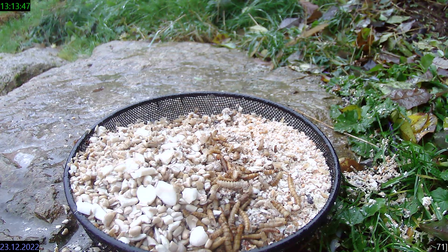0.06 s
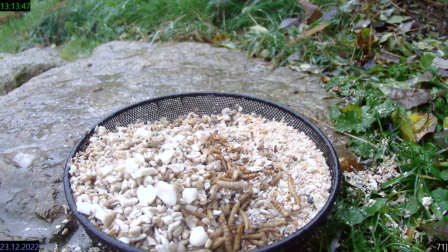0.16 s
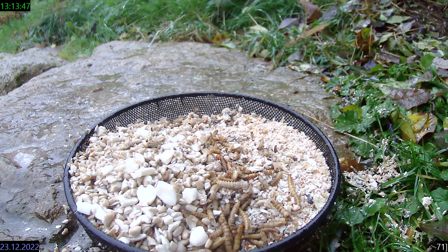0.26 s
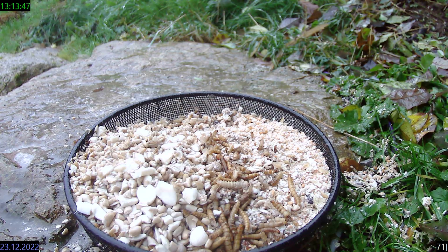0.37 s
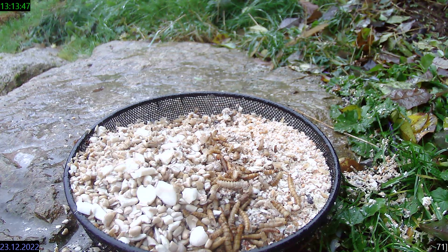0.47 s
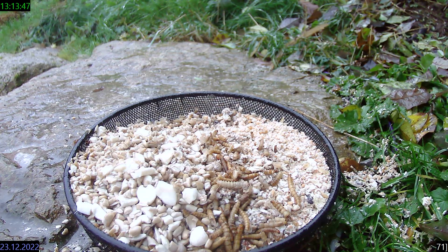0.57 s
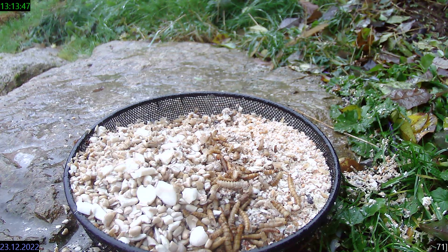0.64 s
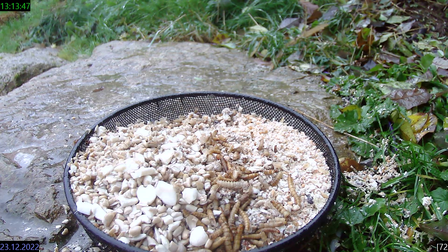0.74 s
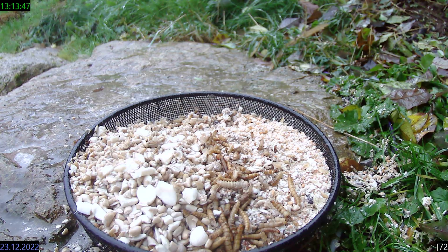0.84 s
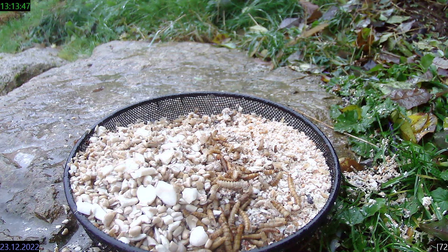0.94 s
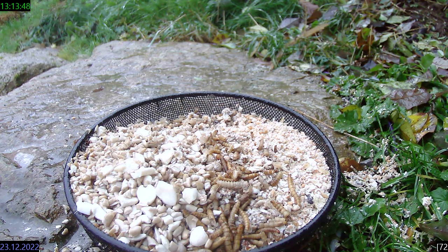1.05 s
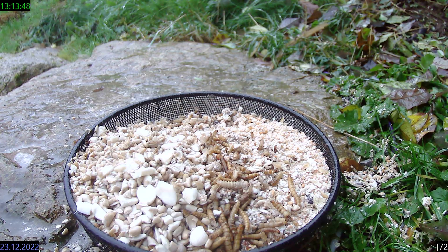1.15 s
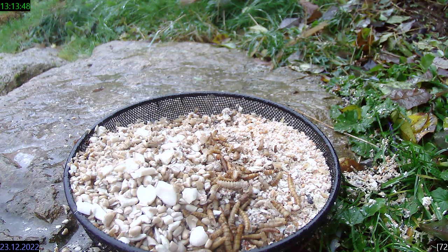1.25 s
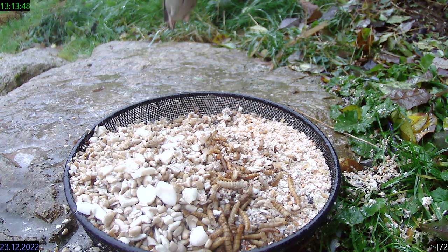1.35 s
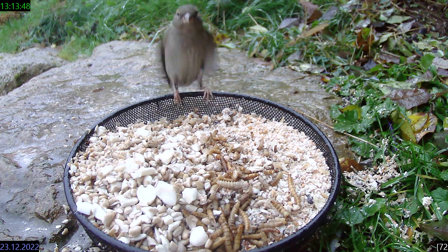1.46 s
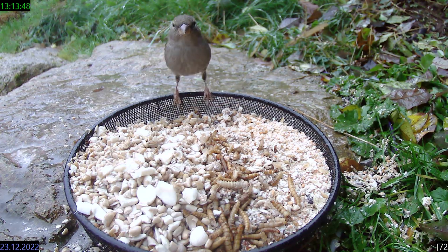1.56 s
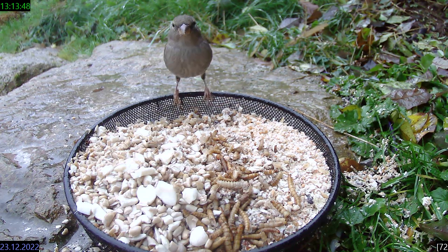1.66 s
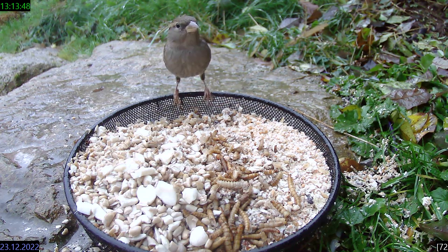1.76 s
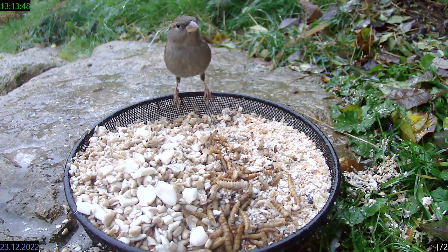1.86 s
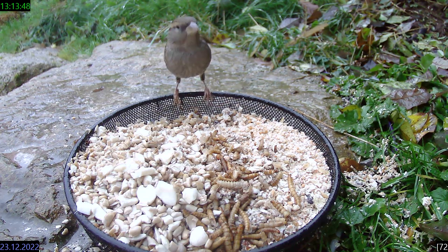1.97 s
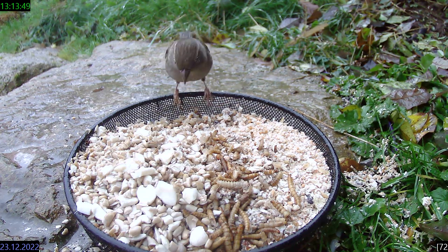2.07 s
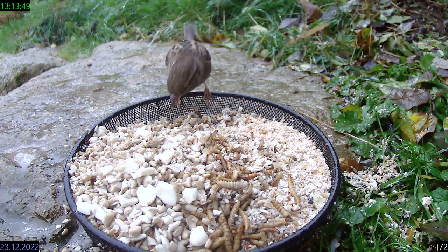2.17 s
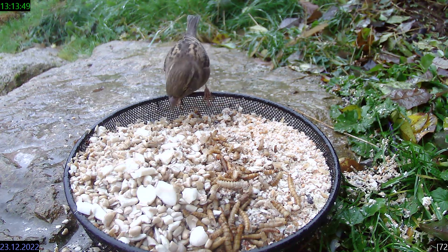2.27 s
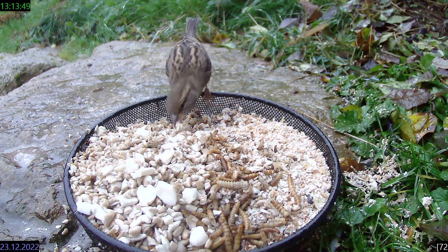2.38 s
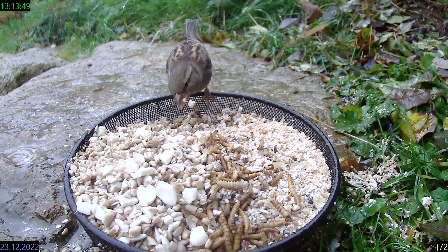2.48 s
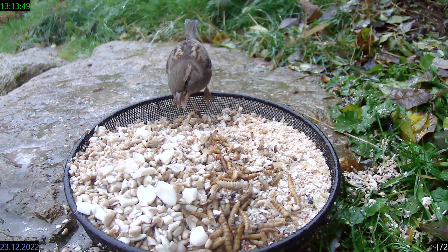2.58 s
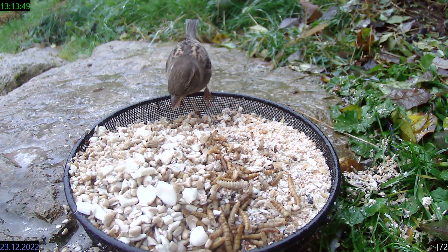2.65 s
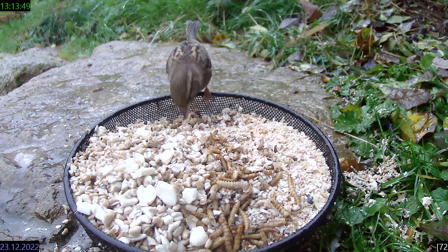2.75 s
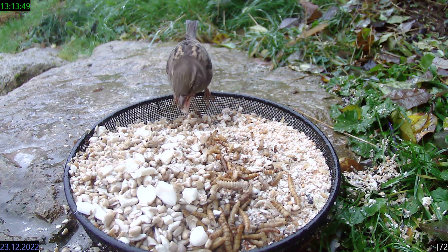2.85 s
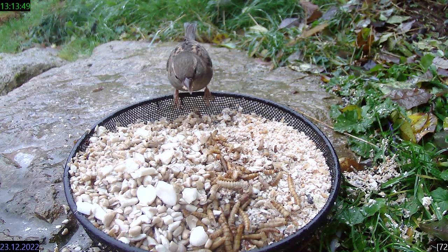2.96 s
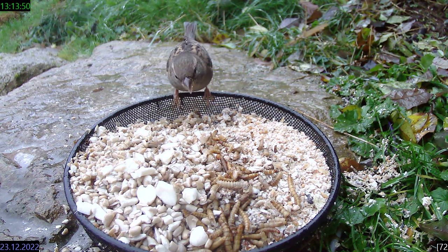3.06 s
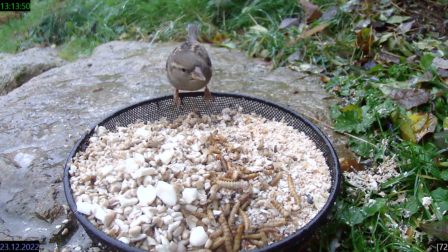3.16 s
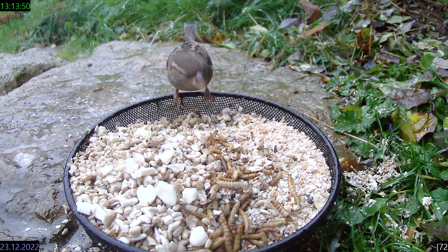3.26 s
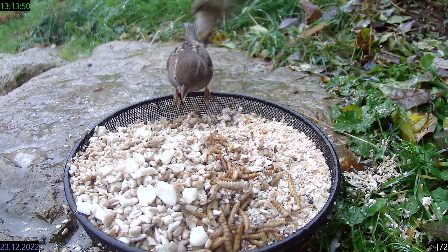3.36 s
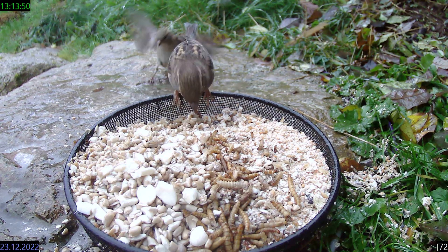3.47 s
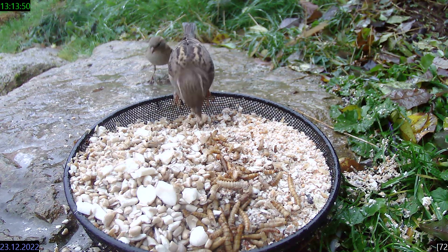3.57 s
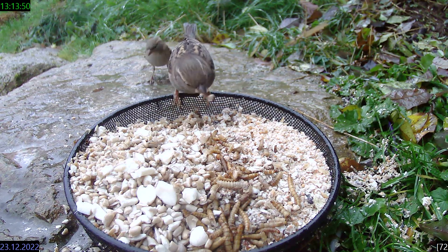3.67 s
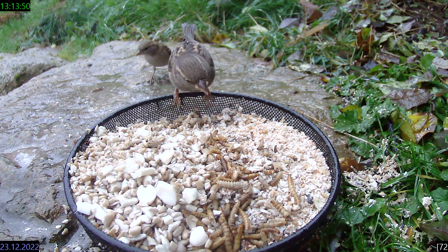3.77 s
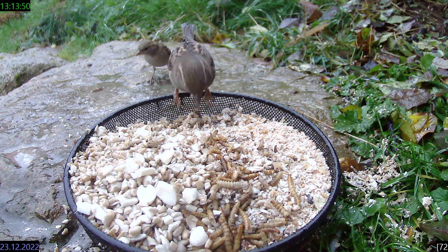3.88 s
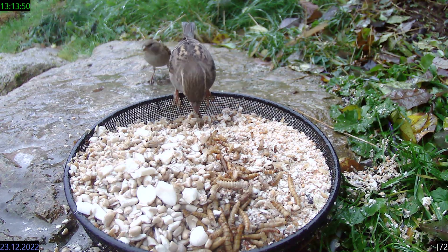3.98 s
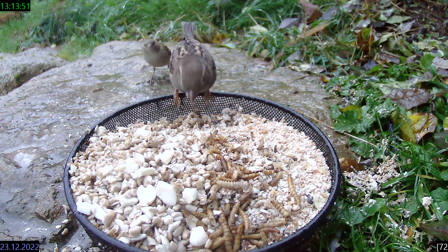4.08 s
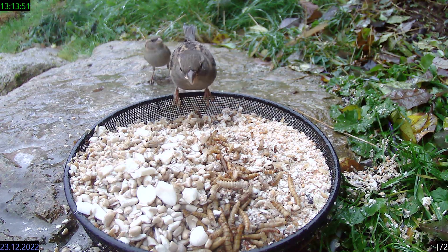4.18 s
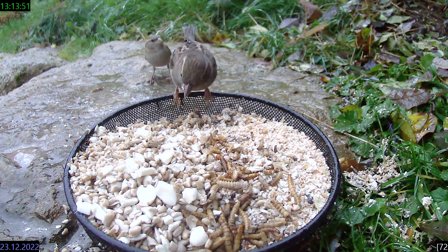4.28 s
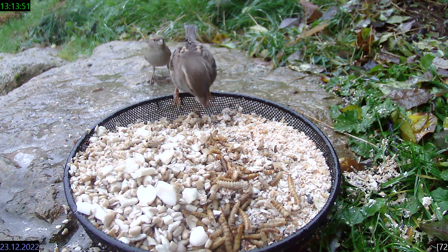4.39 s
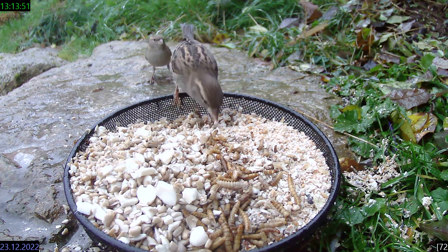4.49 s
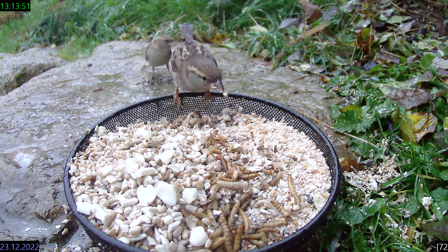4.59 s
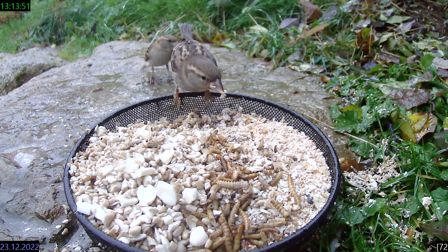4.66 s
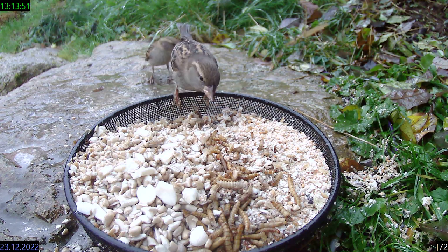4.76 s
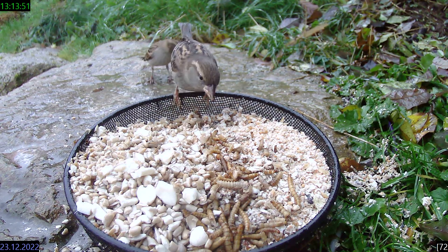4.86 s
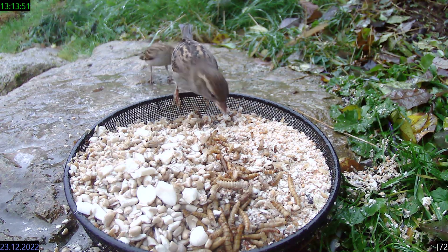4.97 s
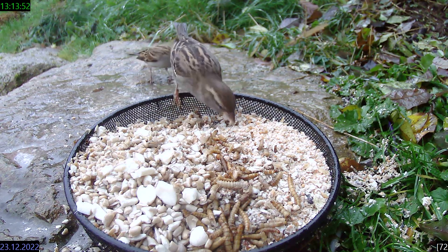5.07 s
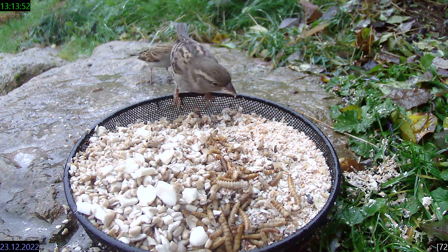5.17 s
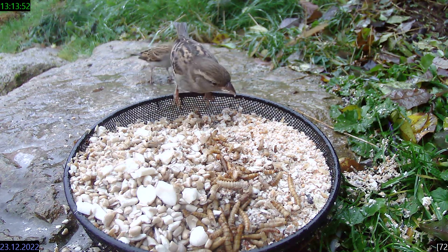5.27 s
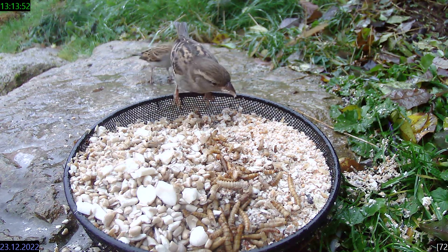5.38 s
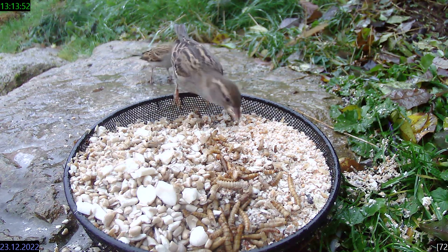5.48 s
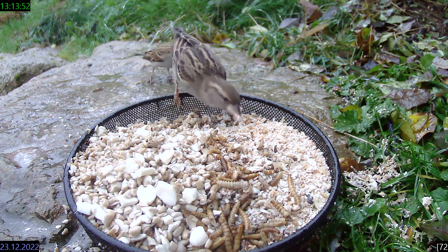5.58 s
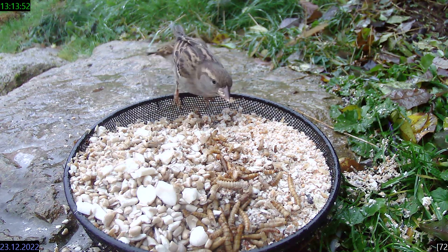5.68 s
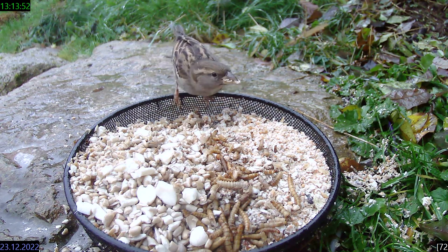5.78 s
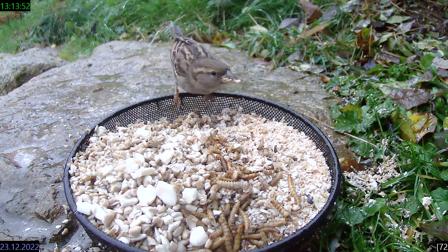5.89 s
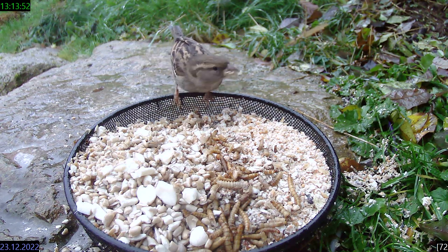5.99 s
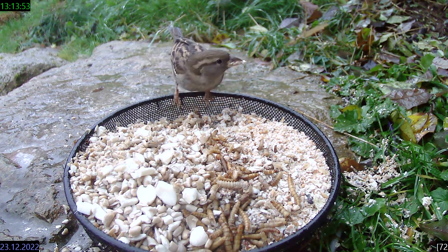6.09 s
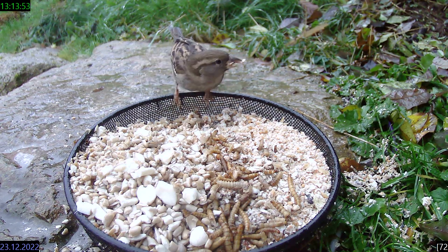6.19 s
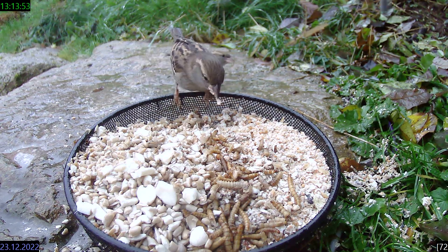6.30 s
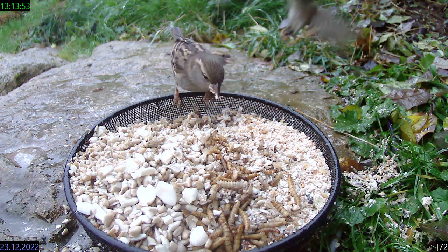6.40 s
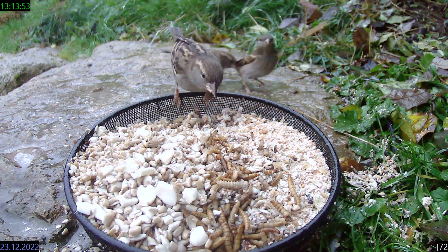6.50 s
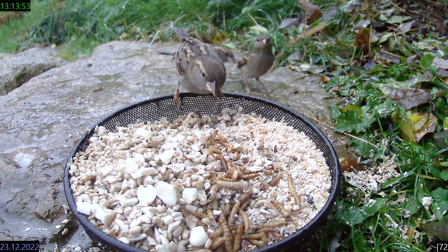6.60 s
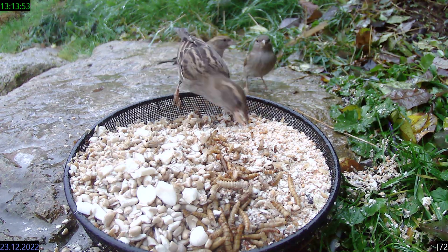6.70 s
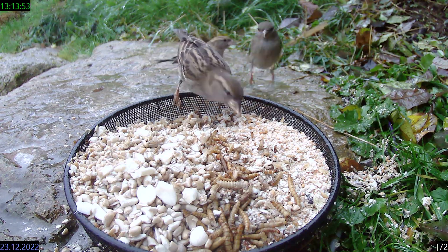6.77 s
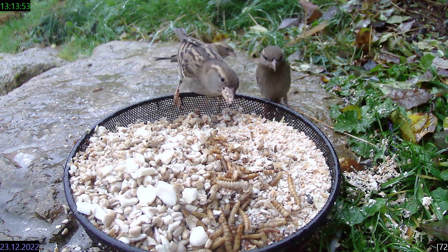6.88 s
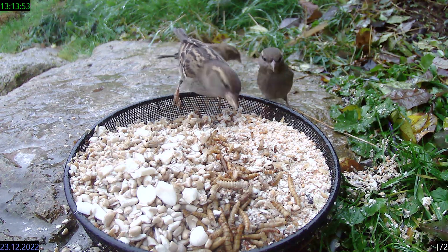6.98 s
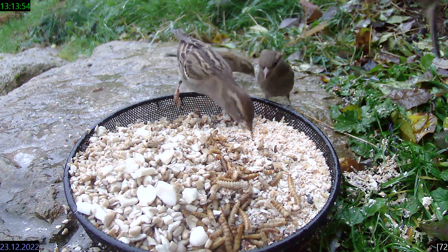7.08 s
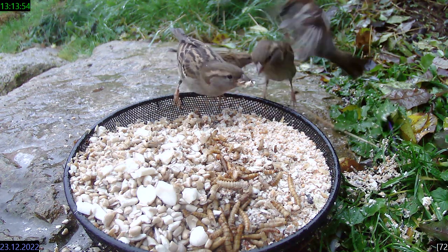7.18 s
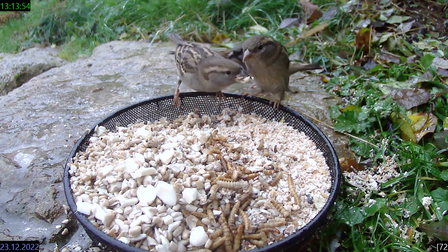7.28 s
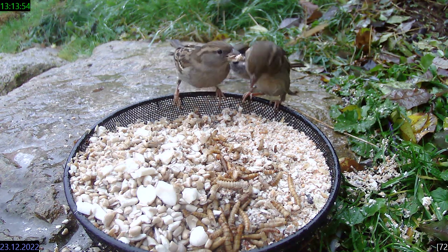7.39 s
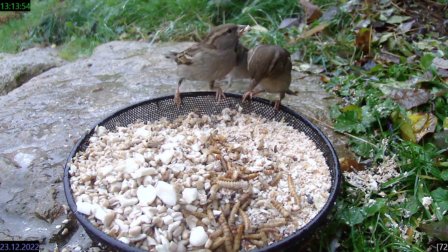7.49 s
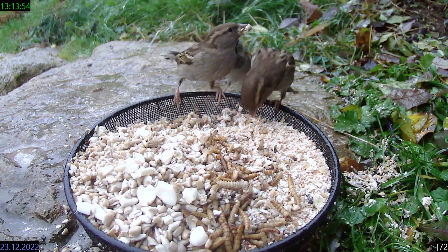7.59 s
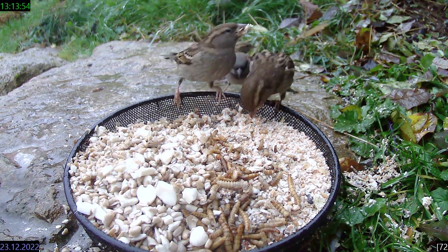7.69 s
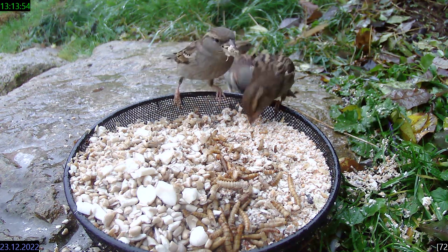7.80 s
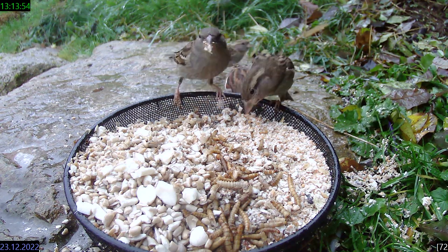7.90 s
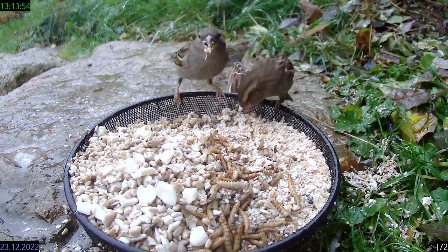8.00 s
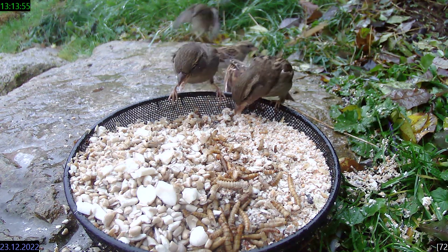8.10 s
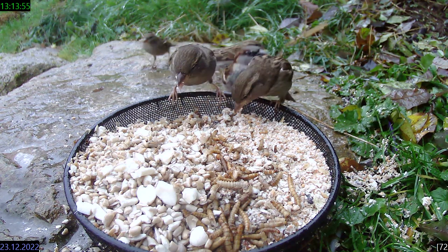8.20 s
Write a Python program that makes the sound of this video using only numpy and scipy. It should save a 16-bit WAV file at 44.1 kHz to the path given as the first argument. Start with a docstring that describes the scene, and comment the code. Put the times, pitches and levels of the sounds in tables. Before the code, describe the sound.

Small birds flutter in with short, soft bursts of rapid wingbeats at a seed tray, with light pecking ticks and brief chirps over quiet garden hiss.

```python
"""Garden hiss and faint far hums are heard first; chirps and ticks of claws and beaks join them.
Then sparrows fly in flurries to a seed tray on a rock, close to a small camera microphone.
Noise filtered by spectra and bands gives hiss, ticks and feather swish; gliding sines give hums and chirps.
Each wingbeat is a clap of accelerating cycles, a swish of noise and a push of air: a dip, then a surge.
The recorder adds a wandering offset, drops out once, and limits the band."""
import sys
import numpy as np
from scipy import signal
from scipy.fft import rfft, irfft
from scipy.io import wavfile
from scipy.ndimage import uniform_filter1d

SR = 44100
rng = np.random.default_rng(int(sys.argv[2]) if len(sys.argv) > 2 else 0)


def generate_wav(signal):
    """Clip the signal to [-1, 1] and save it as 16-bit WAV at the path in sys.argv[1]."""
    frames = np.transpose(np.atleast_2d(signal))
    scaled = np.clip(frames, -1, 1) * 32767
    pcm = np.round(scaled).astype(np.int16)
    wavfile.write(sys.argv[1], SR, pcm)


N = 363692  # length [samples]

# Wingbeats: (time of clap [s], clap level [dB], clap pitch [Hz], low swish level [dB],
# high swish level [dB], air push level [dB])
WINGBEATS = [(.866, -60, 390, -63, -67, -65), (.897, -47.5, 463, -64, -66, -55),
             (.9344, -49, 480, -64, -64, -59), (.9785, -49.5, 750, -61.5, -63.5, -56),
             (1.0142, -48.5, 450, -62, -64, -53), (1.1257, -55, 200, -75, -62.5, -60),
             (1.1643, -40, 467, -50.5, -57.5, -44), (1.2047, -44.5, 540, -53, -60, -52),
             (1.2431, -40.5, 660, -50, -57.5, -53), (1.2817, -41, 248, -57, -62, -44.5),
             (1.3034, -61, 560, -64, -64, -70), (1.3309, -60, 660, -58.5, -65, -44.5),
             (1.4158, -65, 430, -61, -60, -38), (1.4525, -42, 330, -48.5, -55.5, -41),
             (1.4907, -55, 726, -68, -66, -65), (3.1141, -58, 360, -68, -72, -68),
             (3.148, -50.5, 314, -62, -65.5, -51), (3.188, -50.5, 340, -65, -63, -47),
             (3.229, -48, 242, -56, -62, -49), (3.2699, -46, 246, -52.5, -64, -48),
             (3.3118, -59, 290, -52, -64, -49), (3.3519, -45, 248, -49, -60, -46),
             (3.3929, -43, 790, -51, -58.5, -44), (3.4302, -48, 336, -45, -57.5, -43),
             (3.4681, -61, 296, -57, -63, -68), (6.1649, -59, 250, -64, -62.5, -70),
             (6.2032, -41.5, 406, -60, -59, -54), (6.2411, -43, 363, -56, -60.5, -66),
             (6.278, -50, 272, -59, -61.5, -49.5), (6.3295, -53, 200, -56, -60.5, -52),
             (6.367, -49, 283, -66, -70, -70), (6.378, -46, 510, -52, -58, -45.5),
             (6.4188, -49, 320, -53.5, -64, -45), (6.452, -54, 370, -56, -65.5, -68),
             (6.469, -50, 600, -68, -66, -70), (6.5114, -48.5, 488, -65, -62.5, -68),
             (6.5545, -49, 370, -54, -61.5, -54), (6.5978, -39, 540, -56, -65, -68),
             (6.609, -47, 600, -65, -72, -70), (6.6356, -55, 427, -61, -70, -61),
             (6.649, -47, 547, -54.5, -72, -70), (6.9339, -63, 805, -61.5, -64.5, -47),
             (7.0215, -61, 288, -54.5, -59, -38), (7.0594, -47, 230, -48.5, -56.5, -35.5),
             (7.1015, -36.5, 430, -45.5, -54, -37), (7.1442, -36, 740, -44.5, -49, -40),
             (7.1845, -40.5, 527, -43, -50, -42.5), (7.21, -52, 290, -51, -65, -34.5),
             (7.2401, -59.5, 340, -70, -77, -53), (7.8503, -54.5, 218, -66, -67, -55),
             (7.894, -54, 348, -59.5, -66, -53), (7.9352, -45, 345, -62.5, -64.5, -51),
             (7.9783, -50, 280, -62, -65.5, -58), (8.0214, -45, 300, -55, -63.5, -49),
             (8.0636, -46, 396, -49, -62, -50), (8.1022, -43.5, 488, -54, -62.5, -62),
             (8.14, -58, 194, -57, -66.5, -70)]
# Claws, beaks and feather snaps: (time [s], peak level [dB], pitch [Hz], knock level [dB], scratch level [dB])
TICK_EVENTS = [(0.5097, -63, 2970, -64, -53), (0.575, -54, 4200, -75, -72), (0.6077, -47.5, 3260, -67, -71),
               (.856, -50, 3120, -74, -67), (0.9756, -47.5, 2800, -75, -58), (1.2996, -56, 2950, -55, -60),
               (1.342, -49, 3900, -57, -51), (1.926, -59, 3660, -64, -59), (2.2872, -56, 3330, -66, -63),
               (2.3696, -58, 3350, -61, -63), (2.391, -63, 3480, -60, -49), (2.419, -55, 3360, -59, -56),
               (3.3867, -57, 3770, -53, -59), (3.4269, -46, 3030, -45, -45), (3.434, -45, 2650, -63, -58),
               (3.4638, -56, 2840, -65, -61), (3.6233, -72, 3320, -65, -51), (3.9834, -54, 4900, -61, -66),
               (4.2102, -55, 3000, -72, -68), (4.4097, -56, 3200, -66, -60), (4.503, -56.5, 3350, -66, -57),
               (4.787, -58, 3070, -71, -68), (5.065, -60, 3710, -56, -66), (5.0762, -57, 2990, -62, -67),
               (5.452, -50, 3150, -55, -65), (5.6186, -55.5, 3430, -63, -58), (5.6562, -58, 3160, -72, -56),
               (5.7802, -63, 3410, -72, -53), (6.056, -60, 2820, -63, -52), (6.6925, -50, 3120, -70, -58),
               (7.1004, -46, 2630, -40, -55), (7.1416, -40, 3040, -41, -41), (7.161, -44, 4270, -39.5, -58),
               (7.18, -38.5, 2810, -56, -52), (7.21, -39, 2690, -41.5, -38), (7.2443, -50, 3120, -67, -64),
               (7.2744, -58, 3330, -69, -54), (7.315, -57, 3360, -61, -55), (7.399, -51, 3380, -73, -61),
               (7.618, -58, 2600, -58, -69), (7.676, -58, 3120, -60, -51), (7.849, -58, 3420, -60, -45.5),
               (7.872, -63, 2520, -68, -53), (7.9378, -53, 4330, -70, -62)]
# Chirps, one curve for each voice of the throat: (time [s], pitch [Hz], level before flutter [dB])
CHIRP_CURVES = [
    [(0.178, 4670, -71), (.225, 4280, -77), (.245, 4300, -75)],
    [(.677, 4760, -61), (.686, 5700, -62), (.696, 5300, -68), (.706, 5000, -58)],
    [(.677, 4250, -57), (.686, 4620, -56), (.701, 4570, -70)],
    [(.722, 5100, -58), (.738, 5250, -60), (.75, 5100, -62), (.762, 4400, -65), (.777, 3600, -64)],
    [(.722, 4330, -60), (.735, 4000, -63), (.746, 3930, -56.5), (.755, 3800, -51), (.765, 3540, -70)],
    [(1.885, 1320, -58.5), (1.915, 1290, -74)],
    [(4.605, 4270, -79), (4.68, 4350, -78)],
    [(4.85, 4250, -78), (4.92, 4250, -79)],
    [(5.495, 11000, -69), (5.512, 10900, -76)],
    [(6.964, 4930, -52.5), (6.98, 4350, -64), (6.993, 4000, -63), (7.012, 3470, -65)],
    [(6.97, 3600, -70), (6.99, 3400, -69)],
    [(7.346, 8650, -70), (7.361, 9400, -73), (7.372, 9400, -71)],
]
# Spectrum of feather swish through the housing: (frequency [Hz], relative level per Hz [dB])
FEATHER_SPECTRUM = [(59, -55), (100, 6), (129, 10), (343, -9), (389, -8), (910, -9.5), (1080, -11.5),
                    (1310, -14), (1760, -28.5), (3050, -16), (4020, -25.5), (4470, -20.5), (5770, -26.5),
                    (10900, -23.5), (16000, -37)]
# Spectrum of the garden hiss: (frequency [Hz], relative level per Hz [dB])
GARDEN_SPECTRUM = [(8.8, -33), (15, -10.5), (20, -21.5), (22, -23), (33, -30), (59, -25.5), (106, -30.5),
                   (146, -29), (394, -33), (1190, -36), (1600, -40.5), (3410, -41.5), (4560, -45),
                   (14700, -50.5), (16000, -49.5)]
# Wavering far hums: (time [s], upper hum level [dB], lower hum level [dB])
HUM_LEVELS = [(0, -68, -70), (.65, -72.5, -76), (.9, -69.5, -63), (1.7, -80, -72), (2.1, -76, -78),
              (3, -77, -77), (3.9, -74.5, -77), (4.8, -85, -74), (5.2, -80, -79), (6.9, -82, -74.5),
              (8.25, -90, -76)]
# Dropout of the recorder: (time of cut [s], time fade-in starts [s], time back to full [s])
DROPOUT_TIMES = (.7046, .712, .7245)
# Soft gusts without a clap: (time of dip [s], level [dB], dip-to-surge lag [s])
SOFT_GUSTS = [(3.812, -47, 0.021), (7.29, -43.5, 0.019), (7.318, -49, .024), (7.384, -53.5, 0.011)]
# A perched bird shuffles its feathers: (time [s], length [s], level [dB])
FEATHER_SHUFFLES = [(1.865, .18, -75.5), (2.26, 0.24, -73)]
# Flurries, each passing at its own angle: (start time [s], treble relative to high swish [dB],
# buffet relative to clap [dB], extra rustle between strokes [dB], clap-to-dip lag [s], dip-to-surge lag [s])
FLURRY_SETTINGS = [(.8, -4.5, -20.5, 1.5, 0.0052, 0.01), (1.1, -5, -14.5, 3, 0.0074, .0115),
                   (1.4, -5.5, -14, 0.5, 0.0065, 0.012), (3.1, -3.5, -16, -0.5, 0.0065, 0.014),
                   (6.1, -4, -18.5, -1.5, 0.014, 0.016), (6.35, -3.5, -18.5, 0, .01, 0.011),
                   (6.5, -7, -22.5, 1.5, .007, 0.011), (6.9, -4, -15, 0, 0.0032, .0155),
                   (7.8, -2, -13, 0, 0.0065, 0.016)]

GARDEN_DB = -62.5
UPPER_HUM_HZ, LOWER_HUM_HZ = 80.9, 49
OFFSET_DB = -42  # the converter's offset wanders around this level
EDGE_HZ = 15830  # upper band limit of the recorder
KNOCK_HZ, SCRATCH_HZ = 1203, 6070  # ring of the housing, lower edge of the scratch
SWISH_START_S = -0.0015  # the high swish starts near the clap and peaks after it
RUSTLE_S, RUSTLE_DB = 0.043, (-8.5, -9.5, -10)  # spread around a stroke; under its (low, middle, treble) swish
BUFFET_S, BUFFET_PUSH_DB = 0.03, -24  # spread around a stroke; level relative to its push
FEEDING_S, FAINT_TICKS = (1.9, 7.9), 13  # time span and number of faint pecks
FAINT_DB, FAINT_HZ = (-61, -66, -60), 3300  # their central (peak, knock, scratch) levels and pitch


def gain_of(db):
    """Amplitude ratio: 20 dB is a factor of ten."""
    return 10 ** (np.asarray(db) / 20)


def power_of(db):
    """Power ratio: the square of the amplitude ratio."""
    return gain_of(2 * np.asarray(db))


def evened(x):
    """Normalisation to unit rms."""
    return x / np.sqrt(np.mean(x ** 2) + 1e-20)


def add(mix, s, sound):
    """Superposition: adds a sound to the mix from time s [s]."""
    part = mix[round(s * SR):][:len(sound)]
    part += sound[:len(part)]


def coloured(x, points):
    """Linear filtering by a spectrum, interpolated in dB over log frequency."""
    point_hz, point_db = np.transpose(points)
    hz = np.fft.rfftfreq(len(x), 1 / SR)
    db = np.interp(np.log(hz + 1), np.log(point_hz + 1), point_db)
    return irfft(rfft(x) * gain_of(db), len(x))


def band(x, low_hz, high_hz):
    """Band-pass filtering between two edges."""
    sos = signal.butter(3, [low_hz, high_hz], "band", fs=SR, output="sos")
    return signal.sosfilt(sos, x)


def drift(smooth_s):
    """Random fluctuation of unit rms: noise averaged twice over a sliding window."""
    width = int(smooth_s * SR)
    once = uniform_filter1d(rng.standard_normal(N), width)
    return evened(uniform_filter1d(once, width))


def swell(t, rise_s, fall_s):
    """Exponential build-up and decay, with a peak of 1."""
    shape = (1 - np.exp(-t / rise_s)) ** 2 * np.exp(-t / fall_s)
    return shape / shape.max()


def spread(s, db, width_s):
    """Summed power of Gaussian swellings around the times s, quicker up than down."""
    power, t = np.zeros(N), np.arange(-5000, 5000) / SR
    shape = np.exp(-(t / np.where(t < 0, 0.54 * width_s, width_s)) ** 2)
    for at, level_db in zip(s, db):
        add(power, at + t[0], power_of(level_db) * shape)
    return power


def flurry_of(s):
    """Piecewise-constant settings: the columns of the flurry that each beat belongs to."""
    rows = np.array(FLURRY_SETTINGS)
    return rows[np.searchsorted(rows[:, 0], s) - 1].T


def garden():
    """Filtered random noise: a gently breathing hiss with tiny far crackles in it."""
    struck = rng.random(N) < 25 / SR  # 25 crackles a second on average
    strength = gain_of(18 + 3.3 * np.minimum(rng.exponential(1, N), 2))
    crackle = struck * strength * rng.choice([-1, 1], N)
    breathing_db = 0.043 * drift(0.22) + 0.77 * drift(0.027)
    hiss = rng.standard_normal(N) * gain_of(breathing_db)
    return gain_of(GARDEN_DB) * evened(coloured(hiss + band(crackle, 1220, 12000), GARDEN_SPECTRUM))


def hums():
    """Frequency modulation: two low tones whose pitch wanders."""
    s, upper_db, lower_db = np.transpose(HUM_LEVELS)
    t = np.arange(N) / SR
    out = np.zeros(N)
    for hz, db in ((UPPER_HUM_HZ, upper_db), (LOWER_HUM_HZ, lower_db)):
        pitch = hz * (1 + 0.01524 * drift(0.19))
        tone = np.sin(2 * np.pi * np.cumsum(pitch) / SR)
        out += np.sqrt(2) * gain_of(np.interp(t, s, db)) * tone  # levels are rms
    return out


def chirps():
    """Frequency and amplitude modulation: gliding whistles that tremble in pitch and strength."""
    out, tremble = np.zeros(N), drift(0.005)
    for rows in CHIRP_CURVES:
        s, hz, db = np.transpose(rows)
        t = np.arange(s[0], s[-1], 1 / SR)
        wobble = tremble[round(s[0] * SR):][:len(t)]
        pitch = np.interp(t, s, hz) * (1 + 0.01 * wobble)
        whistle = np.sin(2 * np.pi * np.cumsum(pitch) / SR)
        level = np.sqrt(2) * gain_of(np.interp(t, s, db))
        add(out, s[0], level * whistle * signal.windows.tukey(len(t), 0.15))
    return out * gain_of(2.8 * drift(0.0025))  # flutter in strength


def faint_ticks():
    """Random scatter: rows for small pecks and steps, varied in time, strength and pitch."""
    when = rng.uniform(*FEEDING_S, FAINT_TICKS)
    luck = rng.standard_normal((FAINT_TICKS, 4))
    peak_db, knock_db, scratch_db = (FAINT_DB + 3 * luck[:, :3]).T
    hz = FAINT_HZ * (1 + 0.09 * luck[:, 3])
    return list(zip(when, peak_db, hz, knock_db, scratch_db))


def ticks():
    """Impulsive excitation: a noise scratch rings a middle band, knocks the housing and hisses at the top."""
    out, t = np.zeros(N), np.arange(900) / SR
    rows = TICK_EVENTS + faint_ticks()
    noises = rng.standard_normal((len(rows), len(t)))
    for (s, db, hz, knock_db, scratch_db), noise in zip(rows, noises):
        middle = band(noise * swell(t, 0.0003, 0.0016), 0.83 * hz, 1.18 * hz)
        knock = band(noise * swell(t, 0.00048, 0.0024), 0.87 * KNOCK_HZ, 1.2 * KNOCK_HZ)
        scratch = band(noise * swell(t, 0.0001, 0.0024), SCRATCH_HZ, 15600)
        for level_db, part in [(db, middle), (knock_db, knock), (scratch_db, scratch)]:
            add(out, s, gain_of(level_db) * part / abs(part).max())
    return out


def buffet():
    """Modulated low-band noise: wobbles of pressure that follow the beating wings and the gusts."""
    s, clap_db, *_, push_db = np.transpose(WINGBEATS)
    gust_s, gust_db, lag = np.transpose(SOFT_GUSTS)
    power = spread(s, clap_db + flurry_of(s)[2], BUFFET_S)
    power = power + spread(s, push_db + BUFFET_PUSH_DB, BUFFET_S)
    power = power + spread(gust_s + lag, gust_db - 14.5, BUFFET_S)
    return evened(band(rng.standard_normal(N), 90.7, 146)) * np.sqrt(power)


def pushes():
    """Near-field pressure: suction and pressure as a wing sweeps by give a dip, then a surge."""
    out, t = np.zeros(N), np.arange(-2500, 4000) / SR
    clap_s, *_, push_db = np.transpose(WINGBEATS)
    *_, dip_lag, surge_lag = flurry_of(clap_s)
    for s, db, lag in list(zip(clap_s + dip_lag, push_db, surge_lag)) + SOFT_GUSTS:
        dip = np.exp(-(t / (0.22 * lag)) ** 2)
        surge = 1.24 * np.exp(-((t - lag) / (0.32 * lag)) ** 2)
        add(out, s + t[0], gain_of(db) * (surge - dip))
    return out


def clap(t, hz, luck):
    """Chirped pressure pulse: uneven cycles speed up, swell into a sharp suction spike and stop short."""
    unevenness = 1 + 0.22 * evened(uniform_filter1d(luck, 60))
    pitch = hz * np.exp(np.minimum(t, 0.003) / 0.012) * unevenness
    turns = np.cumsum(pitch) / SR
    cycles = -np.cos(2 * np.pi * (turns - np.interp(0, t, turns)))  # a trough at the clap
    core = 0.2 * np.exp(-(t / 0.0012) ** 2)
    skirt = 0.5 * np.exp(-(t / np.where(t < 0, 0.007, 0.004)) ** 2)
    spike = (1 - (t / 0.0004) ** 2) * np.exp(-(t / 0.0004) ** 2)
    return cycles * (core + skirt) - 0.6 * spike


def wings():
    """Turbulent noise and pulses: wing tips clap; air rushes through the feathers, most on each stroke."""
    t, around = np.arange(4000) / SR, np.arange(-700, 900) / SR
    claps, low, high, treble = np.zeros((4, N))  # the last three are powers
    lucks = rng.standard_normal((len(WINGBEATS), len(around)))
    for (s, clap_db, hz, low_db, high_db, _), luck in zip(WINGBEATS, lucks):
        add(claps, s + around[0], gain_of(clap_db) * clap(around, hz, luck))
        add(low, s - 0.004, power_of(low_db) * swell(t, 0.00079, 0.0082))
        swish = power_of(high_db) * swell(t, 0.004, 0.006)
        add(high, s + SWISH_START_S, swish)
        add(treble, s + SWISH_START_S, swish * power_of(flurry_of(s)[1]))

    shuffle = np.zeros(N)
    for start, length, db in FEATHER_SHUFFLES:
        add(shuffle, start, power_of(db) * np.hanning(round(length * SR)))

    s, _, _, low_db, high_db, _ = np.transpose(WINGBEATS)
    _, treble_db, _, extra_rustle_db, _, _ = flurry_of(s)
    bands = [(low, low_db, 200, 1750), (high, high_db, 1750, 5800),
             (treble, high_db + treble_db, 5800, 17000)]
    out, flicks = claps, drift(0.00071)
    for (swish, db, low_hz, high_hz), rustle_db in zip(bands, RUSTLE_DB):
        rustle = spread(s, db + rustle_db + extra_rustle_db, RUSTLE_S)
        power = swish + rustle + shuffle
        lumps = gain_of(2.83 * drift(0.0025) + 1.4 * flicks)  # turbulence per band, feather flicks across all
        air = coloured(rng.standard_normal(N), FEATHER_SPECTRUM)
        air = air + 0.76 * signal.lfilter(*signal.iirpeak(1310, 7, SR), air)  # the housing rings
        rush = band(air, low_hz, high_hz)
        out = out + evened(rush * lumps) * np.sqrt(power)
    return out


def scene():
    """Superposition of all sources in one channel."""
    background = garden() + hums()
    birds = chirps() + ticks() + buffet() + pushes() + wings()
    return (background + birds)[None]


def record(dry):
    """Recorder response: the offset wanders; the signal is cut once and fades back; then the band limit."""
    t = np.arange(N) / SR
    cut, start, back = DROPOUT_TIMES
    fade = np.clip((t - start) / (back - start), 0, 1)
    live = np.where(t < cut, 1, np.sin(np.pi / 2 * fade) ** 2)
    sag = -gain_of(-60) * np.exp(-((t - start) / 0.004) ** 2)  # slight undershoot around the start of the fade
    soft_noise = signal.lfilter([0.3], [1, -0.7], rng.standard_normal(N))
    self_noise = gain_of(-67.5) * soft_noise  # soft hiss, heard in the gap
    offset = gain_of(OFFSET_DB + 0.9 * drift(0.4))
    out = (dry + offset) * live + sag + self_noise * (1 - live)
    padded = np.pad(out, ((0, 0), (256, 256)), "edge")
    low_pass = signal.firwin(513, EDGE_HZ, window=("kaiser", 9), fs=SR)
    return signal.oaconvolve(padded, low_pass[None], "valid")


dry = scene()
out = record(dry)
generate_wav(out)
```